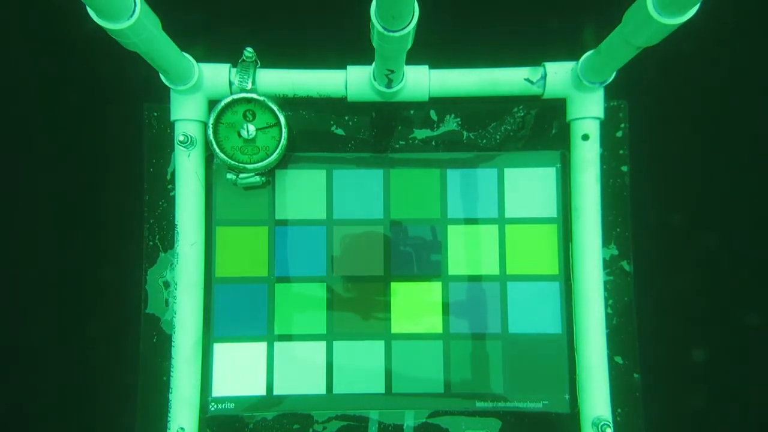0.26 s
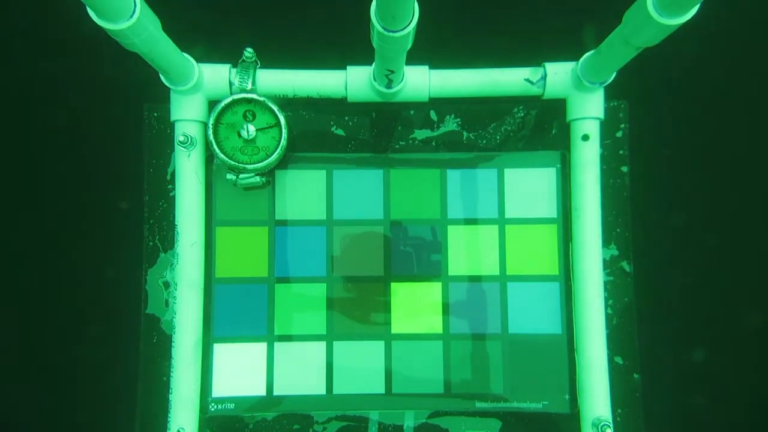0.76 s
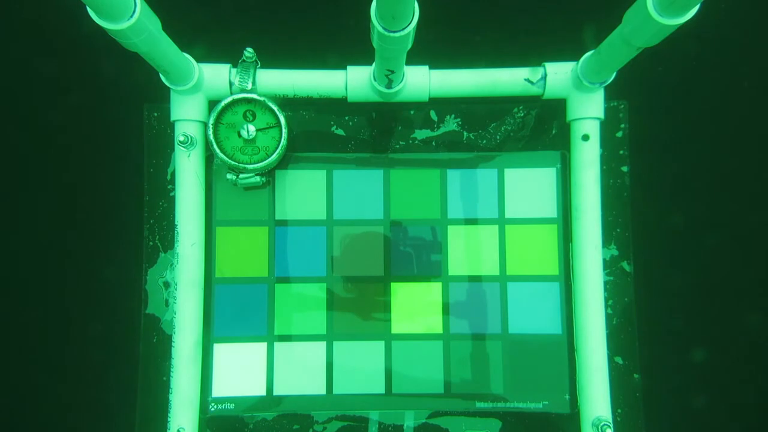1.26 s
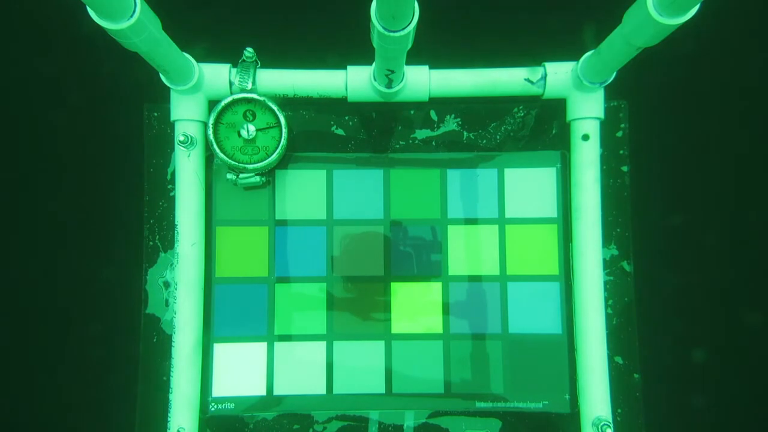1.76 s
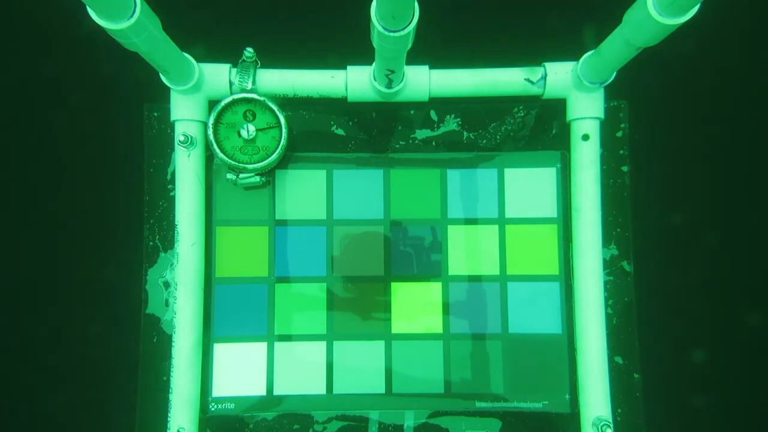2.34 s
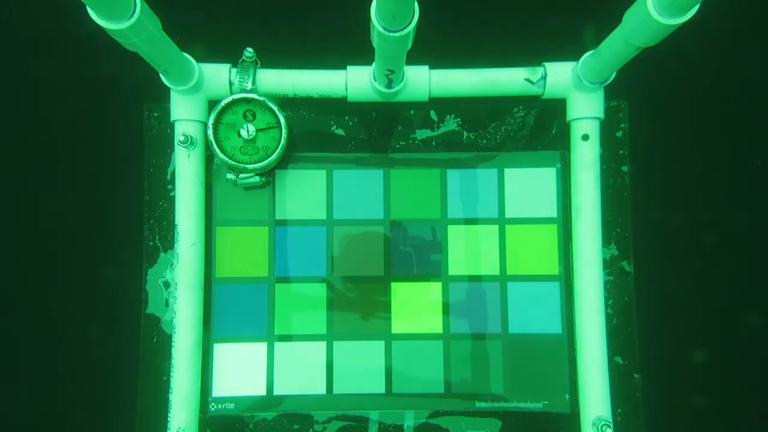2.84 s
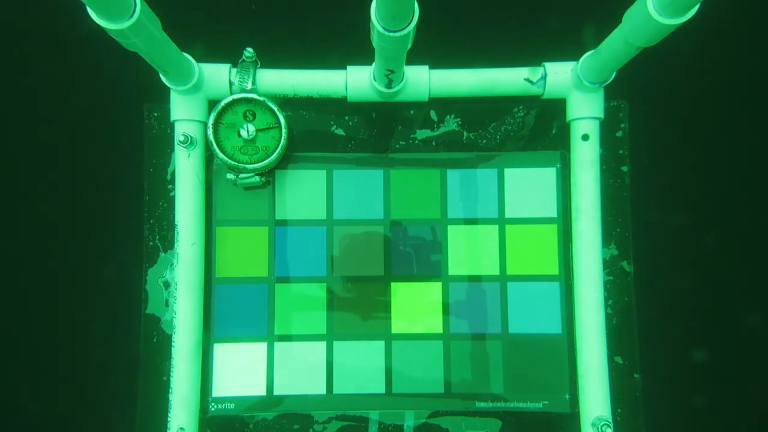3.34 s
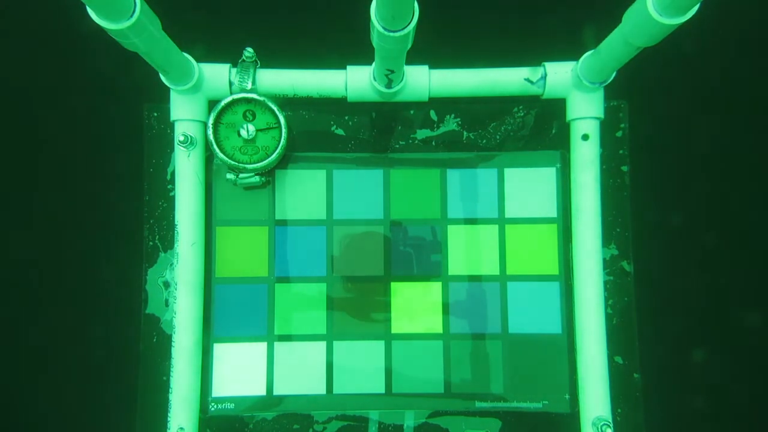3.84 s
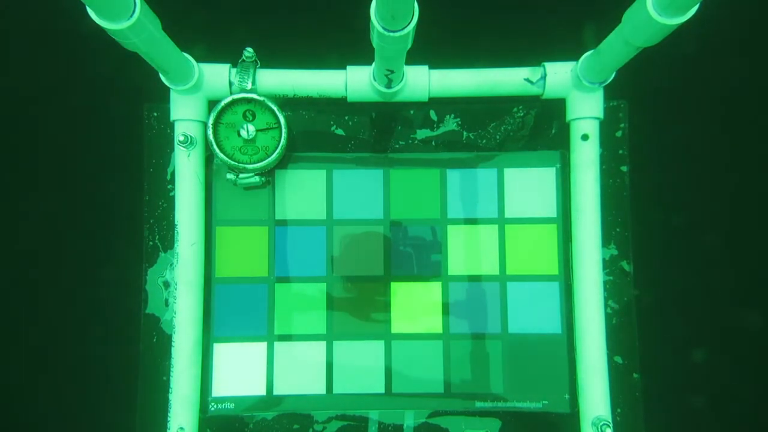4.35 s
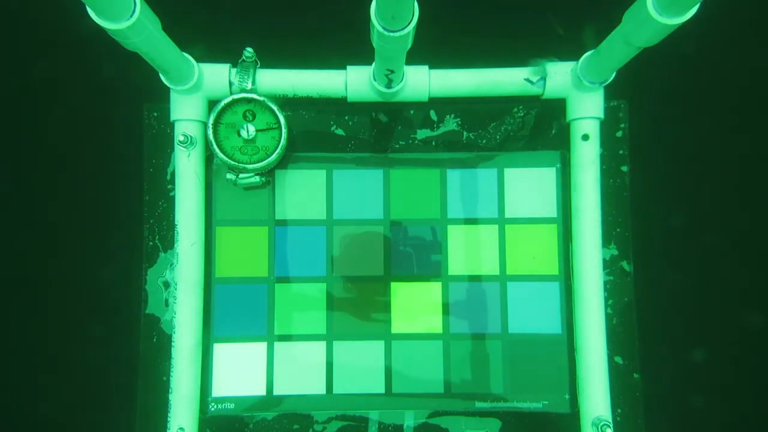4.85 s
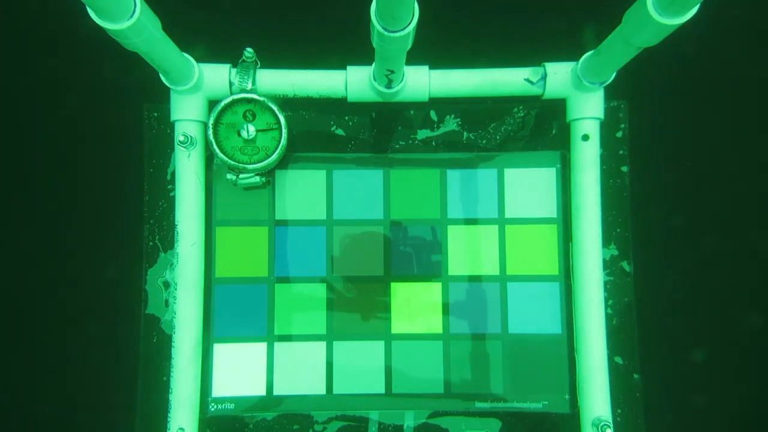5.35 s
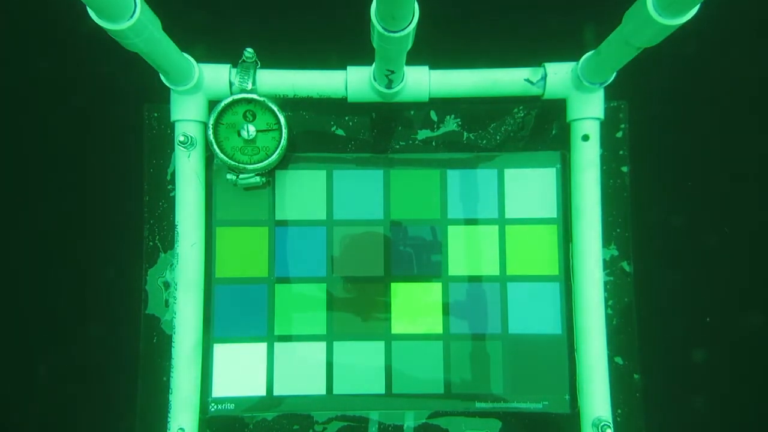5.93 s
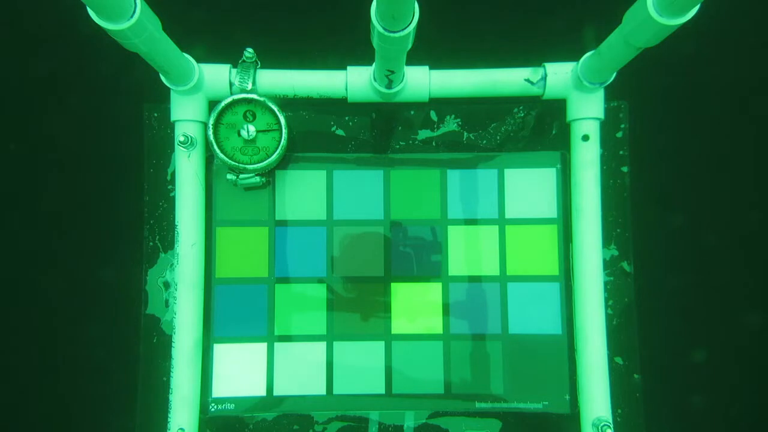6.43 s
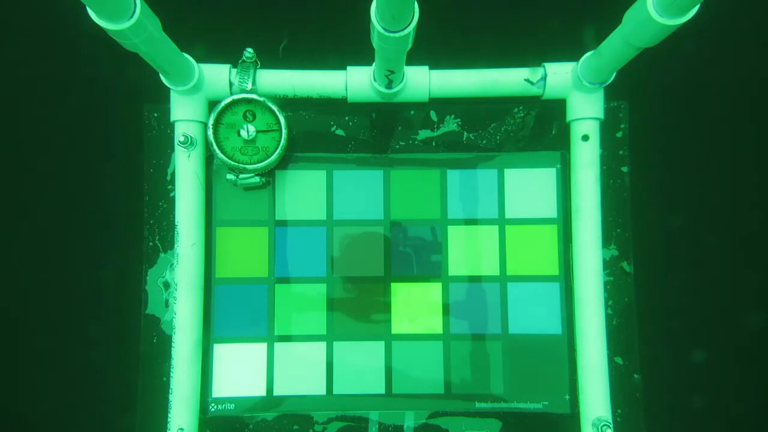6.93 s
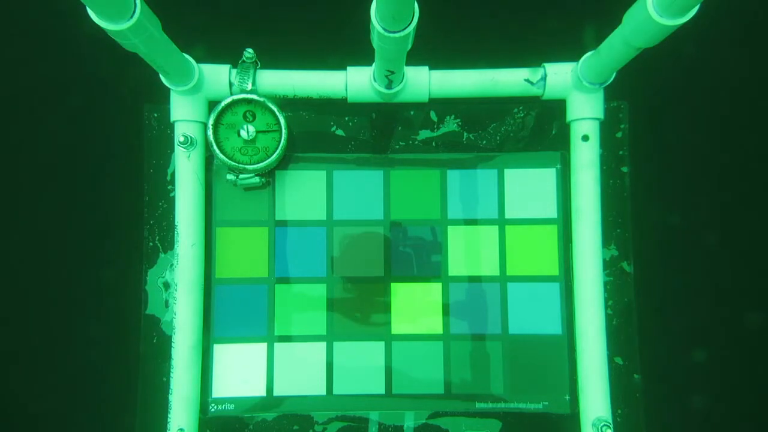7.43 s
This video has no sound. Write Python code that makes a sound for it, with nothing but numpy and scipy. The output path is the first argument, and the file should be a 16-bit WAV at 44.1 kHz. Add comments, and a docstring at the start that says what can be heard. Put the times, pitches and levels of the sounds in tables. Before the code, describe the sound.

Muffled underwater hiss with scattered hard snaps ringing hollowly, short bubble pops and dull thuds, growing busiest in a final rattling cluster.

```python
"""Snaps and bubbles around an underwater camera

A camera in a sealed housing hangs in the sea. Snaps, bubbles, soft thumps and water noise reach its two
microphones by making the housing ring. Direct gliding tones are bubbles bursting on its wall and one low
falling tone of a water push. Faint squeaks are narrow bands of noise, and deep pushes are swelling low noise.
Beneath lie shaped microphone hiss and two thin sine whines of the electronics. A limiter ducks everything
after loud knocks."""
import sys
import numpy as np
from scipy import signal
from scipy.fft import rfft, irfft, next_fast_len
from scipy.io import wavfile

SR = 44100
rng = np.random.default_rng(int(sys.argv[2]) if len(sys.argv) > 2 else 0)


def store_wav(level_fs):
    """Save 16-bit WAV to argv[1]."""
    pcm = np.round(np.clip(np.atleast_2d(level_fs), -1, 1) * 32767)
    wavfile.write(sys.argv[1], SR, pcm.T.astype(np.int16))


N = 338247
TIME = np.arange(N) / SR   # seconds

# ways (modes) in which the housing rings: f/Hz, width/Hz, left gain/dB, right gain/dB, lag of the left/us
HOUSING_MODES = [(350.5, 77.4, -25.5, -28.5, 51), (606, 62, -27, -26, 146), (695, 51.3, -15.5, -20, 270),
                 (976.6, 43.8, -5, -9.5, 173), (1270.6, 78.6, -9, -10.5, 30), (1331.4, 72.5, -10, -12, 30),
                 (1645, 175, -38.5, -37.5, 30), (1908, 44, -24.5, -50, 30), (2022, 112, -26.5, -26.5, 30),
                 (2657, 390, -39.5, -32, 30), (2753, 126, -31.5, -28, 30), (3200, 83, -37.5, -45.5, 30),
                 (4010, 500, -39.5, -40.5, 30), (4845, 117, -39, -44.5, 30), (6370, 194, -38, -38, 30),
                 (7160, 200, -41.5, -41, 30), (9000, 1500, -52, -52.5, 30), (198, 260, -36.5, -38.5, 50),
                 (476, 142, -38, -41.5, 100)]
# groups of modes that a snap strikes, one entry per group: centre f/Hz
GROUP_HZ = [1320, 430, 750, 1020, 1950, 2800, 4400, 6600, 9000]
# half-width of each group: pitch ratio/1 (a narrow group starts softly)
GROUP_SPREAD = [1.112, 1.48, 1.43, 1.16, 1.13, 1.304, 3, 1.1, 1.2]
# gain of each group: gain/dB
GROUP_GAIN_DB = [45.6, 67.5, 55.4, 46.1, 59.8, 60.06, 69.1, 67.3, 72.6]
WALL_CUT_HZ = 110

# snaps, short pressure pulses, some with a thin high tick, as they are before group gain and housing:
# t/s, level/dB, strongest f/Hz, fall below it/dB per octave, fall above it/dB per octave
SNAPS = [(0.0906, -16, 610, 20, 9), (0.0915, -19, 2310, 44, 31), (0.27, -17.5, 1970, 9.5, 14.5),
         (0.3506, -30, 1320, 15, 7.5), (0.386, -31, 1140, 14, 21), (0.388, -36, 9000, 38, 10),
         (0.4645, -29.5, 1046, 16, 32), (0.4636, -19, 2100, 54, 23), (0.6765, -16.5, 1350, 11.5, 14),
         (0.7247, -32, 1320, 20, 20), (0.748, -32, 1100, 14, 16), (0.7595, -28, 1320, 22, 14),
         (0.678, -29.5, 9000, 37, 10), (1.695, -20, 1310, 16, 28), (1.696, -41, 6600, 40, 30),
         (2.0656, -26, 1160, 26, 22), (2.488, -40, 2400, -1, 7), (3.6518, -25, 2640, 16, 70),
         (4.106, -31, 1500, 7, 14), (4.227, -35, 1500, 19, 11), (4.925, -25.5, 2160, 4, 15),
         (5.1667, -9.5, 1280, 20, 8.5), (5.2065, -29.5, 1880, 4, 21), (5.2055, -27.5, 9000, 21, 10),
         (5.3966, -12, 1950, 9, 12), (5.6487, -26, 1160, 22, 24), (5.7683, -21, 1230, 13.5, 11),
         (6.1577, -12.5, 1330, 14.5, 9), (6.157, -32, 3700, 40, 30), (7.5745, -34.5, 750, 19, 9),
         (6.8525, -9, 1210, 10, 8.5), (6.8525, -30.5, 4540, 22, 27), (7.003, -25, 700, 17, 11),
         (7.004, -34.5, 2800, 55, 60), (7.2665, -13, 1030, 36, 35), (7.2748, -22, 1110, 14, 40),
         (7.298, -20, 2630, 59, 95), (7.347, -19, 1210, 23, 28), (7.346, -27.5, 6600, 28, 60),
         (7.373, -32.5, 1950, 20, 30)]
# floor of every snap's treble: level one octave above its strongest pitch, and the fall from there
CRACK_DB, CRACK_FALL_DB_PER_OCTAVE = -38, 7

# bubbles in open water, levels before the housing:
# t/s, first f/Hz, last f/Hz, length/s, power of the glide/1, level/dB, rise/s, time to fall 60 dB/s
BUBBLES = [(0.089, 2130, 2200, .03, 1.2, 0, 0.0026, 0.091), (0.156, 4200, 4100, .012, 1.1, -2, .002, .05),
           (0.463, 2290, 2250, 0.0065, 0.96, 15, 0.0015, 0.017),
           (0.464, 3450, 3370, .015, 1.1, 8, 0.0017, 0.047),
           (0.775, 1360, 1360, 0.025, 1.1, -8, 0.002, 0.2),
           (0.797, 1358, 1370, 0.024, 1.1, -13, 0.006, 0.45),
           (6.093, 1313, 1310, 0.012, 1.1, -17.5, .005, .1), (6.167, 3030, 3300, 0.0031, .6, 9, .002, .04),
           (7.583, 725, 745, 0.014, 1.1, -12, 0.0037, .1),
           (2.487, 2450, 2380, 0.006, 1.1, 12, 0.0019, 0.022),
           (2.713, 2370, 2380, .011, 1.1, -0.5, 0.0017, .03),
           (2.737, 4020, 4090, .014, 1.1, -10, .002, 0.049),
           (2.997, 373, 362, 0.026, 0.86, -3, 0.0022, 0.15),
           (3.024, 350, 350, 0.034, 1.1, -13, 0.0052, 0.078),
           (3.652, 2150, 2130, .012, 1.1, 8.5, 0.0012, 0.037),
           (3.662, 2070, 2000, .015, 1.1, -11, .003, .06),
           (5.655, 868, 824, 0.038, 0.99, -8, 0.0018, 0.084),
           (7.017, 1340, 1350, 0.009, 1.1, -10, .003, 0.089),
           (7.174, 1365, 1453, 0.032, 0.3, 12.5, 0.0022, 0.032),
           (7.269, 750, 730, 0.027, 1.8, -8, 0.0014, 0.076),
           (7.27, 1030, 960, 0.0067, 1.1, -15.5, .002, 0.067),
           (7.296, 730, 726, 0.024, 1.1, -6, 0.0011, 0.11), (7.303, 1560, 1640, 0.039, 1.2, 1, 0.0045, 0.2),
           (7.329, 1050, 1040, 0.011, 1.3, -13, .0015, .04),
           (7.317, 2770, 2700, 0.039, 1.2, -4, 0.0024, 0.069),
           (7.347, 1030, 940, .018, 1, -21, 0.0022, .08), (7.387, 985, 940, .02, 1.1, -24, 0.0036, .08),
           (7.574, 377, 394, 0.039, 1.3, -7.5, 0.0044, 0.13)]
# direct gliding tones: bubbles bursting on the wall, and at 0.83 s the low falling tone of a water push;
# levels are for the left: t/s, first f/Hz, last f/Hz, length/s, power of the glide/1, level/dB, rise/s,
# time to fall 60 dB/s, left minus right/dB
DIRECT_TONES = [(0.0903, 1324, 1310, 0.019, 1.1, -2.5, 0.0031, 0.053, 1.3),
                (0.0904, 900, 946, .011, 0.54, -7, 0.0062, 0.032, 2.5),
                (0.101, 872, 842, 0.082, 0.44, -18, 0.0046, 0.13, -1.5),
                (0.108, 1300, 1394, 0.056, 0.8, -16.5, .005, 0.21, 1.8),
                (0.4641, 1500, 1400, 0.0054, 0.74, -8.5, .002, .05, 1.2),
                (0.4688, 1440, 1360, .0035, 1.1, -12.5, 0.00084, .05, 1),
                (0.468, 1547, 1640, 0.08, 1.7, -24.5, 0.0023, 0.13, 0),
                (0.4715, 1400, 1350, 0.014, 1.1, -24, 0.0018, .2, 1.8),
                (0.83, 100, 56.6, 0.19, 0.27, -43, 0.03, .7, 7),
                (2.488, 1050, 890, .038, 0.46, -1, 0.0026, 0.087, 8.5),
                (2.4886, 1250, 1350, .017, 0.4, -5.5, 0.0036, 0.024, 1.5),
                (3.652, 2770, 2740, .011, 1.1, -48, .0015, .04, 0),
                (3.654, 1390, 1340, 0.01, .6, -27.5, 0.0033, .1, 1.5),
                (4.9232, 1305, 1420, 0.017, 0.88, 0, 0.0032, 0.021, 3.5),
                (4.9245, 1220, 950, 0.026, 0.51, -11, 0.0038, 0.1, 8),
                (5.2058, 1290, 1270, 0.01, 1.1, -15, .003, .3, 3),
                (5.213, 1180, 1030, .02, 0.66, -22, .004, .1, 5),
                (7.0037, 1290, 1376, 0.01, 0.55, -10, 0.0024, 0.026, 0.5),
                (7.0029, 997, 965, 0.011, 1.1, -5, 0.0027, 0.11, 9),
                (7.01, 1002, 957, .016, 0.82, -7.5, 0.0097, 0.27, 7),
                (7.025, 1010, 1010, 0.013, 1.1, -12.5, 0.0052, .2, 4),
                (7.037, 1030, 1045, 0.0081, 1.1, -15, 0.0037, .2, 4.5),
                (7.042, 1156, 1420, 0.023, 0.66, -20.5, 0.015, .06, 1),
                (7.194, 2020, 2000, .006, 1.1, -31, .002, .05, 8),
                (7.283, 1218, 1350, .024, 0.94, -14, 0.019, .12, 1),
                (7.2963, 1044, 1060, .0112, 1.1, -9, 0.0015, 0.34, 4),
                (7.307, 1116, 1330, .018, 0.55, -12.5, 0.013, .3, 4),
                (7.3223, 1310, 1340, 0.011, 1.1, -7.5, 0.0029, 0.055, 1),
                (7.331, 1365, 1330, 0.0053, 1.1, -22, 0.0012, .2, 1.5),
                (7.362, 1320, 1335, 0.0086, 1.1, -26, .003, .3, 0),
                (7.3728, 1305, 1320, 0.01, 1.1, -16, .0012, .12, 2)]

# soft low thumps, perhaps a drumming fish, before thump gain and housing: t/s, peak level/dB, f/Hz, width/Hz
THUMPS = [(0.245, -36.5, 275, 140), (1.09, -30.5, 280, 141), (3.892, -28, 290, 130), (4.011, -39, 328, 150),
          (4.02, -28.5, 267, 110), (4.103, -35, 370, 120), (4.104, -30.5, 550, 60), (4.265, -31, 303, 140),
          (4.392, -26, 300, 111), (4.514, -30, 277, 140)]
THUMP_GAIN_DB = 22

# faint rough squeaks and scrapes, rms before fading and left-right balance:
# t/s, length/s, centre f/Hz, width/Hz, level/dB
SQUEAKS = [(0.734, 0.13, 2030, 300, -54.5), (0.694, 0.19, 1340, 300, -42.5),
           (0.816, 0.083, 430, 394, -47.5), (3.887, 0.16, 2164, 35, -56), (4.472, 0.047, 2364, 30, -55),
           (4.482, 0.054, 2170, 50, -58), (4.703, 0.12, 2380, 35, -60), (4.696, 0.057, 2260, 35.2, -51),
           (6.285, 0.092, 2214, 25, -52.5), (6.384, 0.059, 2260, 30, -60), (6.54, 0.051, 2205, 30, -55),
           (6.615, 0.11, 2230, 40, -54.5), (6.88, 0.042, 2080, 250, -49), (7.068, 0.074, 2390, 30, -47.5),
           (7.071, 0.16, 2260, 35, -49.5), (7.073, 0.062, 2150, 30, -48.5), (7.193, 0.037, 2040, 200, -47),
           (7.274, 0.14, 1260, 447, -41), (7.264, 0.06, 660, 300, -49)]
SQUEAK_EVENNESS = .15    # 0 keeps the natural ups and downs, 1 flattens them
SQUEAK_LEFT_DB = -4      # left minus right

# wash of the water on the housing, rms before wash gain and housing: t/s, level/dB
WASH = [(0.0, -38), (3.5, -39), (4.9, -39.5), (5.4, -38.5), (7.1, -38.5), (7.67, -38.5)]

# deep pushes of water on the housing: t/s of the crest, rms level/dB of the part shared by both sides, fall/dB per s
SURGES = [(0.28, -57, 115), (0.68, -59, 200), (0.84, -56, 60), (1.4, -72, 32), (2.5, -65, 117),
          (3.57, -71, 40), (4.16, -66.5, 60), (4.52, -59, 110), (5.19, -71, 70), (5.38, -73, 79),
          (5.63, -66, 47), (6.17, -64, 160), (6.86, -64.5, 78)]
SURGE_HZ, SURGE_WIDTH_HZ, SURGE_RISE_DB_PER_S = 64.7, 58, 354
SURGE_SIDE_DB = -2       # left-right difference relative to the shared part
RUMBLE_DB, RUMBLE_FLICKER_DB = -85, 4

# microphone hiss: f/Hz, level/dB per Hz, left-right likeness/1 (held within -1..1 when used)
HISS = [(20, -81, -0.85), (60, -87.5, -0.3), (150, -80, -1.46), (300, -80, -1), (700, -79.5, -3),
        (1500, -81, -0.9), (2940, -87, -0.88), (5760, -93, -0.51), (10200, -99, -0.23),
        (15700, -106, -0.65), (15300, -118, 4)]
# whines of the electronics: f/Hz, left rms level/dB, right rms level/dB, lead of the left/rad
WHINES = [(7866.8, -67, -57, 1.8), (15733.7, -79, -64, 2.4)]

LIMIT_DB, RELEASE_DB_PER_S, ATTACK_S = -7, 11.5, 0.011
LIMIT_RATIO = 0.59       # dB of ducking per dB above the limit
CUTOFF_HZ = 16000


def amp(db):
    """Turns decibels into a gain."""
    return 10 ** (np.asarray(db) / 20)


def rms_one(x):
    """Scales a sound to rms 1."""
    return x / np.sqrt(np.mean(x ** 2) + 1e-20)


def resonance(x, hz, width_hz):
    """Rings like a struck object: the real part rings as a cosine, the imaginary part as a sine."""
    r = np.exp(-np.pi * width_hz / SR)
    pole = r * np.exp(2j * np.pi * hz / SR)
    return signal.lfilter([2 * (1 - r)], [1, -pole], x + 1e-18)


def flicker(rate_hz):
    """Slow random wandering with rms 1, made by smoothing noise."""
    r = np.exp(-2 * np.pi * rate_hz / SR)
    noise = rng.standard_normal(N + SR)
    smooth = signal.lfilter([1], [1, -2 * r, r * r], noise)
    return rms_one(smooth[SR:])   # drop the start, where the filter is still settling


def housing(pressure, blows):
    """Modes ring with water pressure and the blows on their group; each microphone hears them its own way."""
    out = np.zeros((2, N))
    for k, (hz, width_hz, left_db, right_db, lag_us) in enumerate(HOUSING_MODES):
        group = np.argmin(np.abs(np.log(hz / np.array(GROUP_HZ))))
        # pressure drives the modes with signs that alternate down the list, a blow starts them all together
        push = (-1) ** k * pressure + blows[group]
        ringing = resonance(push, hz, width_hz).imag
        out[0] += amp(left_db) * np.roll(ringing, round(lag_us * SR / 1e6))
        out[1] += amp(right_db) * ringing
    # the stiff walls keep slow pressure out
    return signal.sosfilt(signal.butter(4, WALL_CUT_HZ, "high", fs=SR, output="sos"), out)


def snaps(crackle_db=-25, crackle_s=0.003, treble_db_per_octave=7.0):
    """A click with a brief crackle behind it; each group of modes feels the part around its own pitch."""
    centres = np.array(GROUP_HZ)
    trains, t = np.zeros((len(centres), N)), TIME[:500]
    # above 2000 Hz a snap is more crackle than click
    brighter = amp(treble_db_per_octave * np.maximum(np.log2(centres / 2000), 0))[:, None]
    noise = rng.standard_normal((len(SNAPS), len(t)))
    crackles = amp(crackle_db) * noise * np.exp(-t / crackle_s)
    for (s, peak_db, strongest_hz, below, above), crackle in zip(SNAPS, crackles):
        octaves = np.log2(centres / strongest_hz)
        crack_db = CRACK_DB - CRACK_FALL_DB_PER_OCTAVE * (octaves - 1)
        above_db = np.minimum(np.maximum(-above * octaves, crack_db), 0)
        below_db = below * octaves * (octaves < 0)
        strengths = amp(peak_db + np.minimum(above_db, below_db) + GROUP_GAIN_DB)
        pulses = ((t == 0) + brighter * crackle) / brighter ** .5
        trains[:, round(s * SR):][:, :len(t)] += strengths[:, None] * pulses
    blows = []
    for hz, spread, train in zip(GROUP_HZ, GROUP_SPREAD, trains):
        band = signal.butter(2, [hz / spread, hz * spread], "band", fs=SR, output="sos")
        blows.append(signal.sosfilt(band, train + 1e-18))
    return blows


def glide(s, first_hz, last_hz, length_s, power, db, rise_s, t60, let_go_s):
    """A dying sine whose pitch slides from the first to the last value and breaks off at the end."""
    t = TIME[:round(length_s * SR)]
    hz = first_hz + (last_hz - first_hz) * (t / length_s) ** power
    rise = np.sin(np.pi / 2 * np.minimum(t / rise_s, 1)) ** 2
    decay = amp(-60 * np.maximum(t - rise_s, 0) / t60)
    let_go = np.clip((length_s - t) / let_go_s, 0, 1)
    tone = np.sin(2 * np.pi * np.cumsum(hz) / SR)
    out = np.zeros(N)
    out[round(s * SR):][:len(t)] = amp(db) * rise * decay * let_go * tone
    return out


def bubbles():
    """Bubbles in the open water press on the housing; their tones glide as they change shape."""
    return sum(glide(*row, let_go_s=0.0029) for row in BUBBLES)


def direct_tones():
    """Wall bubbles and a push's low tone reach the left late by the lag of the housing mode nearest in pitch."""
    out, modes = np.zeros((2, N)), np.array(HOUSING_MODES)
    for *row, lean_db in DIRECT_TONES:
        tone = glide(*row, let_go_s=0.00226)
        last_hz = row[2]
        lag_us = modes[np.argmin(np.abs(modes[:, 0] - last_hz)), -1]
        out[0] += np.roll(tone, round(lag_us * SR / 1e6))
        out[1] += amp(-lean_db) * tone
    return out


def thumps(blur_db=-22, blur_s=0.0057):
    """A blurred click sent twice through a low resonance swells and dies in a few cycles."""
    out, t = np.zeros(N), TIME[:3000]
    noise = rng.standard_normal((len(THUMPS), len(t)))
    pulses = (t == 0) + amp(blur_db) * noise * np.exp(-t / blur_s)
    for (s, db, hz, width_hz), pulse in zip(THUMPS, pulses):
        rung = resonance(resonance(pulse, hz, width_hz), hz, width_hz).real
        out[round(s * SR):][:len(t)] += amp(THUMP_GAIN_DB + db) * rung / np.abs(rung).max()
    return out


def squeaks():
    """Narrow bands of noise that swell and fade, their ups and downs slightly evened."""
    out, noise = np.zeros(N), rng.standard_normal(N)
    for s, length_s, hz, width_hz, db in SQUEAKS:
        span = slice(round(s * SR), round((s + length_s) * SR))
        band = resonance(resonance(noise[span], hz, width_hz), hz, width_hz)
        evened = (band / (np.abs(band) + 1e-9) ** SQUEAK_EVENNESS).real
        out[span] += amp(db) * rms_one(evened) * signal.windows.tukey(len(band), .4)
    return out * amp([[SQUEAK_LEFT_DB / 2], [-SQUEAK_LEFT_DB / 2]])


def wash(gain_db=28, flicker_db=1.5):
    """Broad water noise whose level flickers, so that it comes in small lumps."""
    level_db = np.interp(TIME, *np.transpose(WASH)) + gain_db + flicker_db * flicker(13.0)
    return amp(level_db) * rng.standard_normal(N)


def surge():
    """Low noise: a wavering rumble that swells quickly at each push of water and sinks back."""
    level = amp(RUMBLE_DB + RUMBLE_FLICKER_DB * flicker(4.0))
    for s, db, fall in SURGES:
        drop_db = np.maximum(SURGE_RISE_DB_PER_S * (s - TIME), fall * (TIME - s))
        level = np.maximum(level, amp(db - drop_db))
    noise = rng.standard_normal((2, N))
    once = resonance(noise, SURGE_HZ, SURGE_WIDTH_HZ)
    mid, side = rms_one(resonance(once, SURGE_HZ, SURGE_WIDTH_HZ).real)
    # it presses the two microphone ports unevenly
    return level * (mid + amp(SURGE_SIDE_DB) * side * [[1], [-1]])


def electronics():
    """Hiss plus sine whines; widening subtracts each microphone from the other, so hiss is partly out of phase."""
    size = next_fast_len(N)
    hz, db, alike = np.transpose(HISS)
    log_hz = np.log(np.arange(size // 2 + 1) * SR / size + 1)
    gain = amp(np.interp(log_hz, np.log(hz), db)) * np.sqrt(SR / 4)
    alike = np.clip(np.interp(log_hz, np.log(hz), alike), -1, 1)
    mid, side = rfft(rng.standard_normal((2, size)))
    spectrum = gain * (np.sqrt(1 + alike) * mid + np.sqrt(1 - alike) * side * [[1], [-1]])
    out = irfft(spectrum, size)[:, :N]
    for hz, left_db, right_db, lead in WHINES:
        whine = np.sin(2 * np.pi * hz * TIME + [[lead], [0]])
        out += np.sqrt(2) * amp([[left_db], [right_db]]) * whine   # root 2 turns rms into peak
    return out


def scene():
    """Adds the water sounds heard through the housing, the direct sounds and the electronics."""
    pressure = wash() + bubbles() + thumps()
    through_housing = housing(pressure, snaps())
    return through_housing + direct_tones() + squeaks() + surge() + electronics()


def record(dry):
    """A limiter ducks just after loud peaks and creeps back; overloads clip; the top is cut."""
    peak_db = 20 * np.log10(np.abs(dry).max(axis=0) + 1e-9)
    over_db = LIMIT_RATIO * np.maximum(peak_db - LIMIT_DB, 0)
    # hold the deepest ducking so far, less the steady release
    release_db = RELEASE_DB_PER_S * TIME
    held_db = np.maximum.accumulate(over_db + release_db) - release_db
    r = np.exp(-1 / (ATTACK_S * SR))
    duck_db = signal.lfilter([1 - r], [1, -r], held_db)
    limited = np.clip(dry * amp(-duck_db), -.98, .98)
    return signal.sosfilt(signal.ellip(12, .5, 70, CUTOFF_HZ, fs=SR, output="sos"), limited)


dry = scene()
out = record(dry)
store_wav(out)
```